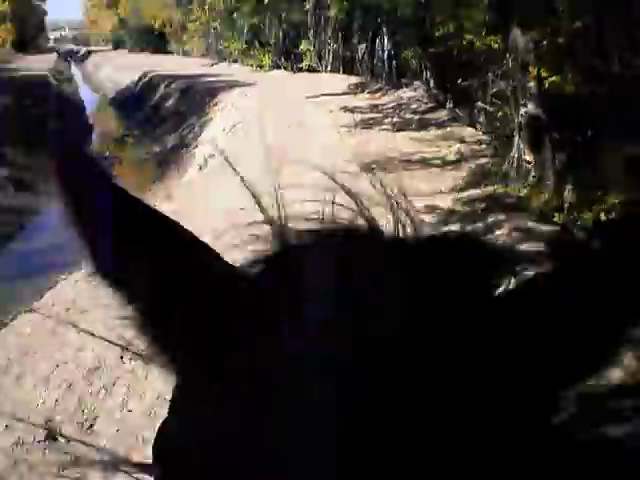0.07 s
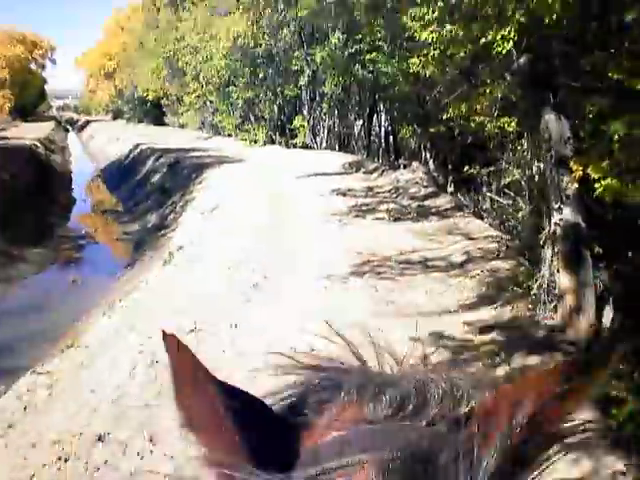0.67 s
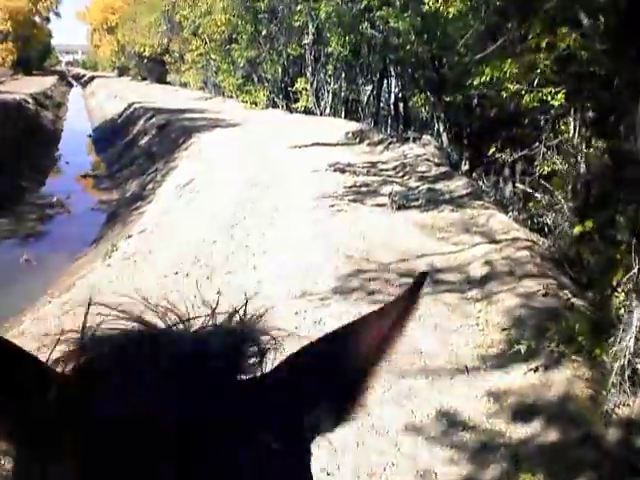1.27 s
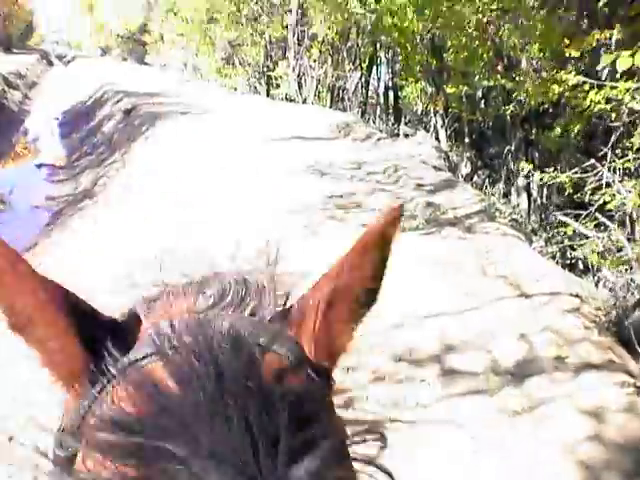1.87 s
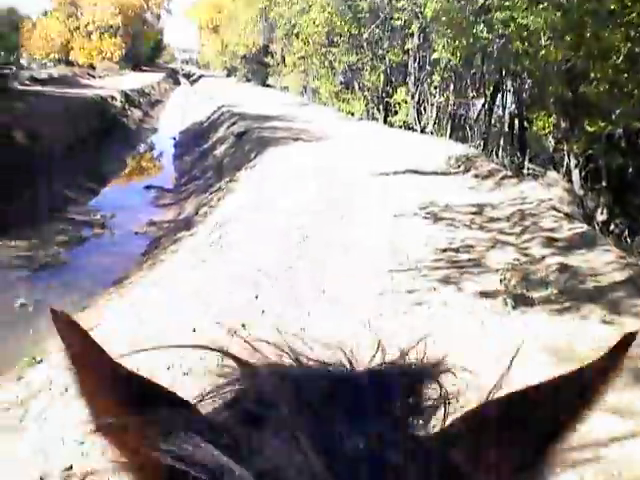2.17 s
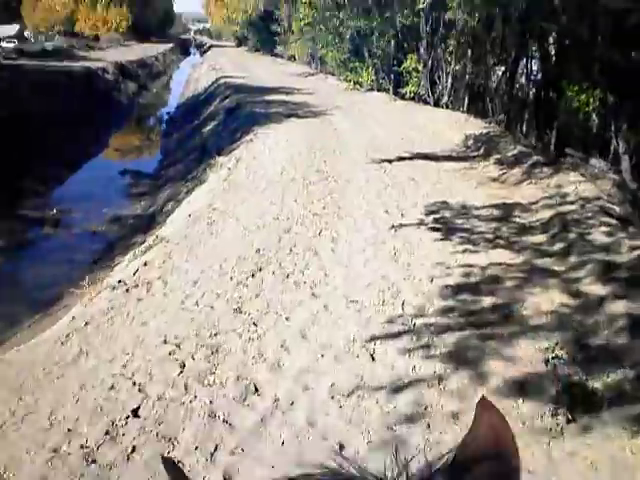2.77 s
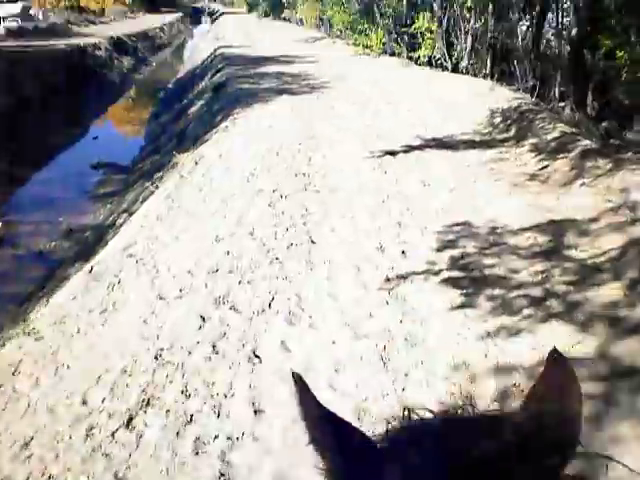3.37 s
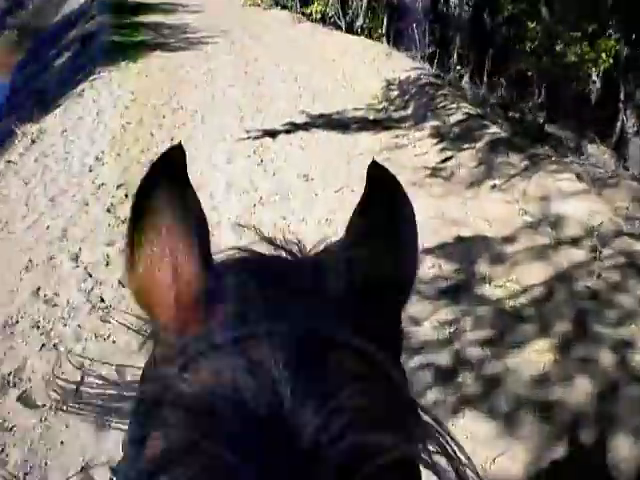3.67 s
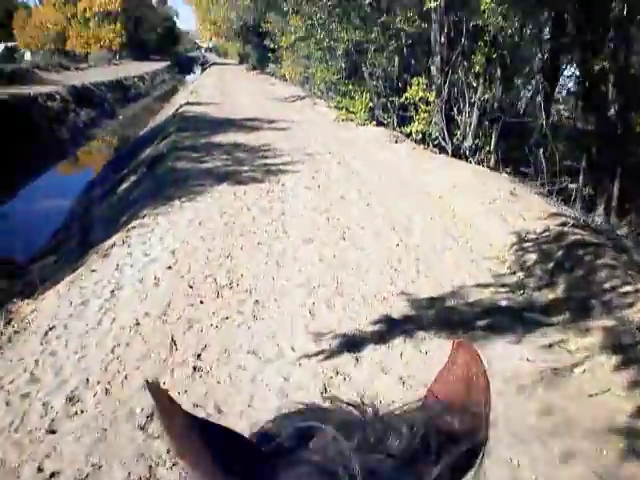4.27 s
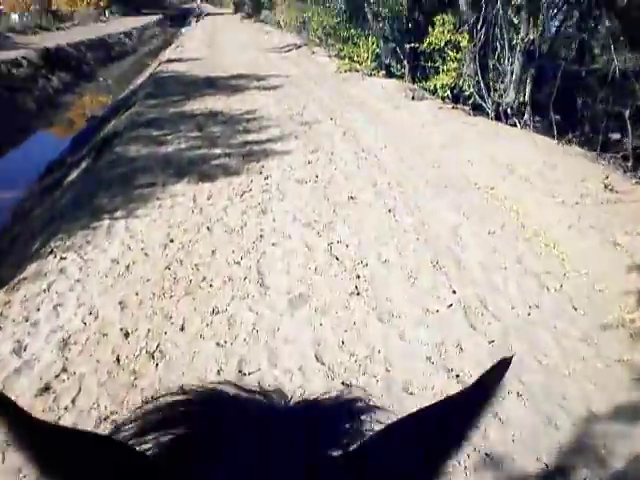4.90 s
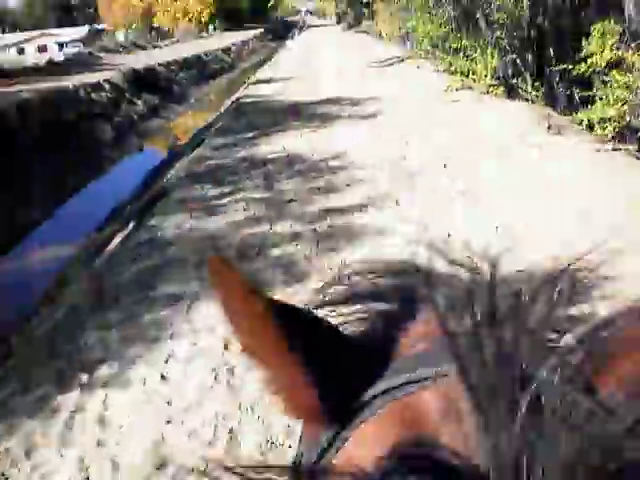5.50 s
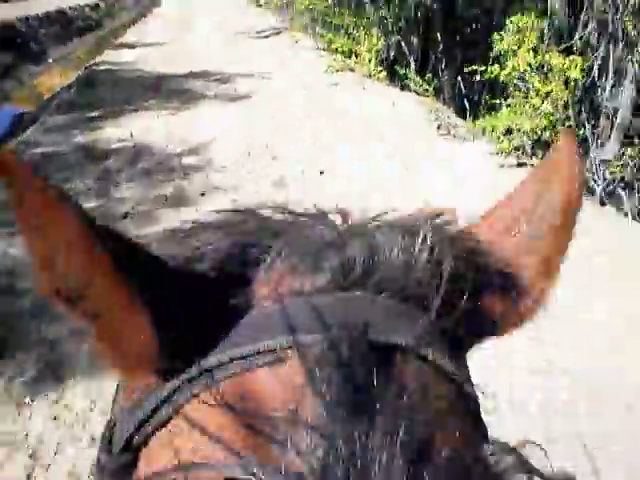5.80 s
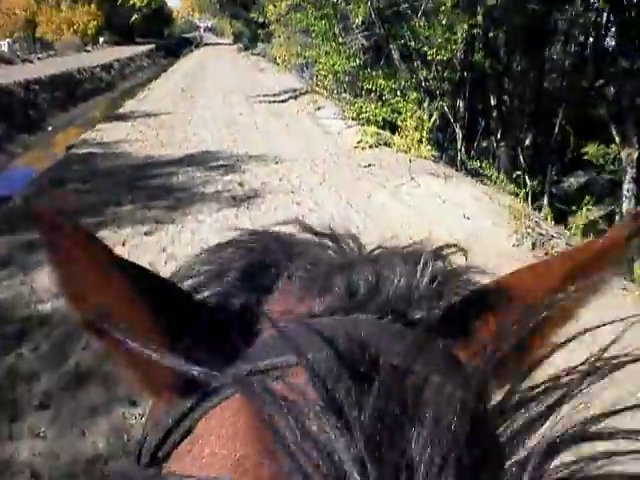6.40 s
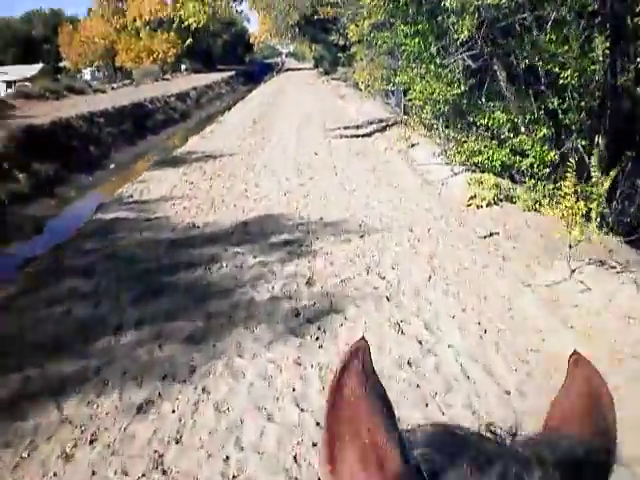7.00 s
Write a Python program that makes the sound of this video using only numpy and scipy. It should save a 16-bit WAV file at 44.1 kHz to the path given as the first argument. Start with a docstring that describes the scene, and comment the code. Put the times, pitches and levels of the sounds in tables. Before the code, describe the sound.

Outdoors on horseback, turbulent air buffets a small microphone with a close, uneven rumble and short thumps. Beneath it come scattered metallic ticks from the tack and a soft rustle of mane and clothes. The ride bumps the camera in irregular clusters, and the mane drags across it once with a brief squeak, followed by faint strap scrapes. Later the gusts grow rougher and crackle.

```python
"""A horse canters along a sandy track, heard through the rider's small camera. After a quiet instant, turbulent
air strikes the microphone: a fluttering rumble that swells in gusts and drops out in lulls. Buckles begin to
tick, mane and clothing rustle with the strides, and from 1 s single hard pulses of air knock the camera body.
Near 1.7 s the mane drags over the casing with a squeak, then straps scrape. As the horse gains speed, small
eddies grow stronger and the wind ends raspier, sputtering."""
import sys
import numpy as np
from scipy import signal
from scipy.fft import rfft, irfft
from scipy.io import wavfile
from scipy.ndimage import uniform_filter1d

SR = 44100
rng = np.random.default_rng(int(sys.argv[2]) if len(sys.argv) > 2 else 0)


def transcribe(u):
    """Save the signal u as a 16-bit wav file named by the first command-line argument.

    u: samples, shape (n,) or (channels, n), limited to [-1, 1]; the rate is SR.
    q: integer samples, one column per channel.
    """
    v = np.clip(np.atleast_2d(u).T, -1, 1)
    q = np.round(v * 32767).astype(np.int16)
    wavfile.write(sys.argv[1], SR, q)


N = 319725
T = np.arange(N) / SR

# The steady air stream. Each row: time in seconds, rumble in dB, rasp relative to the rumble in dB.
STREAM = [(0, -58.5, -28), (.15, -59, -30.5), (.27, -28, -40.5), (.5, -19, -28), (.8, -19.5, -38.5),
          (1.3, -17.5, -24.5), (1.9, -20, -24), (2.2, -18.5, -19), (2.55, -14.5, -14.5), (2.95, -18, -24.5),
          (3.33, -17, -33), (3.55, -17, -21), (3.95, -17, -22.5), (4.45, -19.5, -17), (5.098, -17, -19),
          (5.5, -16.5, -14), (6.1, -19, -14.5), (7.25, -20.5, -14)]
# Gusts. Each row: start, length and rise time in seconds, extra rumble in dB, extra rasp in dB.
GUSTS = [(0.164, 0.034, .004, 9, 3), (0.286, .018, .005, 4, 9), (0.56, 0.11, 0.011, 5, 3.5),
         (0.841, 0.01, .005, 4, 9.5), (0.872, 0.078, .008, 4.5, 10.5), (1.042, 0.076, .008, 3, 4.5),
         (1.172, 0.042, 0.038, 4.5, 12), (1.309, 0.031, 0.0072, 5, 4.5), (1.393, 0.067, 0.0069, 4.5, 4.5),
         (1.556, 0.048, 0.018, -8, 10.5), (1.649, 0.089, .008, 6.5, -2.5), (1.995, 0.13, .006, 3.5, 2),
         (2.408, 0.08, 0.018, 1.5, 1), (2.53, 0.23, .015, 1.25, -1), (2.819, 0.17, .02, 4, 2),
         (2.946, 0.016, 0.0086, 4, -4), (3.063, 0.033, .01, -2, 10), (3.12, 0.02, .02, 6.5, 11.5),
         (3.498, 0.043, 0.011, 0.5, 4), (3.608, 0.019, .005, 5.5, -3), (3.61, 0.11, .008, 2, 8.5),
         (3.958, 0.019, 0.011, 7, 2.5), (4.063, 0.022, 0.011, 5.5, 2.5), (4.124, 0.02, .005, 1.5, 5),
         (4.189, 0.054, .015, 2.5, 5), (4.32, 0.11, 0.051, 2.5, 5.5), (4.519, 0.06, 0.0067, 5.5, 3),
         (4.682, 0.082, 0.0056, 5, 3.5), (4.805, 0.054, 0.013, 3.5, 1.5), (5.268, 0.057, .01, 4.5, -11),
         (5.452, 0.043, .01, 0, 3), (5.794, 0.16, .006, 1.5, -0.5), (5.968, 0.12, .03, 1.5, 5),
         (6.201, 0.033, 0.022, 8, -7), (6.353, 0.12, .012, 3.5, -4), (6.502, 0.062, .02, -1, 4),
         (6.585, 0.045, .006, 3.5, 0.5), (6.653, 0.011, .008, -0.5, 8.5), (6.729, 0.03, .015, 1, 2),
         (6.933, 0.018, .004, 0.5, 6.5), (7.031, 0.052, 0.022, 6.5, -4.5)]
# The stream leaves the microphone. Each row: middle and half length in seconds, depth in dB.
LULLS = [(0.248, 0.0069, 34), (.372, 0.017, 8), (0.407, 0.011, 2), (0.716, 0.0065, 6), (0.987, 0.017, 9),
         (1.26, 0.059, 3), (1.385, 0.0097, 1), (1.844, 0.0058, 25), (1.895, 0.034, 10),
         (1.976, 0.019, 12.5), (2.378, .012, 2.5), (2.505, 0.014, 7.5), (3.015, 0.015, 8.5),
         (3.33, 0.043, 4), (3.287, 0.01, 8.5), (3.4, 0.017, 2.5), (4.055, 0.0088, 5.5), (4.159, 0.013, 5),
         (4.282, 0.011, 3), (4.647, 0.017, 7), (4.793, 0.016, 4.5), (4.856, 0.0065, 8.5), (5.129, 0.03, 4),
         (5.275, 0.012, 6), (5.421, 0.0074, 9.5), (5.741, 0.062, 6.5), (5.772, 0.025, 19.5),
         (5.931, 0.024, 5), (6.182, 0.019, 4), (6.247, 0.0059, 7), (6.33, 0.013, 11), (6.795, 0.02, 18),
         (6.856, 0.011, 11), (6.88, .006, 3), (6.925, 0.0073, 6), (6.983, 0.025, 3.5)]
# Spectrum of the turbulence. Each row: frequency in Hz, relative density in dB.
AIR_SPECTRUM = [(20, -43), (45, -18.5), (90, -7.5), (150, 0), (250, .5), (400, -3.5), (570, -8), (900, -15),
                (1500, -25), (2200, -37), (2800, -47.5), (3500, -57), (5000, -72), (8000, -98.5)]
# How the bands follow the wind. Each row: centre in Hz, share of the rasp, weights in dB of the
# common flutter and of the band's own flicker.
WIND_BANDS = [(40, -0.25, -3, -4.5), (122, 0, 4, 0.5), (258, -0.0842, 3, 0.5), (570, 0.5, 4.5, 2.5),
              (1190, 0.61, 7, 7), (2240, 1.93, 12, 6), (5000, 2.5, 7.5, 9.5)]
# The hardest blows of air. Each row: start in seconds, relative levels of thump and rasp in dB,
# time scale in seconds.
BLOWS = [(0.212, -20.5, -52, .007), (0.327, -7.5, -31.5, 0.0092), (0.432, -7.5, -49, 0.012),
         (0.47, -12, -37, 0.0083), (0.645, -6, -24, 0.0059), (0.742, -4.5, -39, 0.012),
         (0.867, -8, -33, 0.0056), (0.923, -4, -42, .015), (1.036, -5, -33, 0.0073), (1.047, 0, -31, 0.016),
         (1.061, 3.5, -28.5, 0.0089), (1.197, -4.5, -29, 0.031), (1.396, 1, -22, 0.0066),
         (1.414, 1.5, -34, 0.013), (1.489, 1, -21.5, 0.006), (1.679, 1, -25, 0.011),
         (1.819, -13, -23.5, 0.0056), (1.917, -4, -49, 0.0083), (2.003, -1, -16.5, 0.0092),
         (2.07, 2.5, -37, 0.011), (2.108, 0, -16.5, 0.0059), (2.142, -6.5, -18, 0.018),
         (2.349, -8.5, -14.5, 0.0078), (2.427, -3, -19.5, .016), (2.566, -3.5, -15.5, 0.013),
         (2.721, 0, -15.5, 0.0058), (2.783, -2.5, -23, 0.012), (2.84, -2.5, -33, 0.013),
         (2.969, 0, -26, 0.012), (3.15, 2.5, -41, 0.0078), (3.217, -3, -23.5, 0.014),
         (3.366, -8, -36, 0.007), (3.447, -4, -20, 0.0068), (3.605, 0, -16, 0.012),
         (3.887, -1, -28.5, 0.0063), (4.072, -5, -23, .011), (4.119, -2, -29, 0.013),
         (4.213, -2, -27, 0.0054), (4.68, -1.5, -24.5, 0.017), (4.74, -6, -13.5, 0.013),
         (5.022, -5, -23, 0.0074), (5.357, -3, -27, .005), (5.539, -2.5, -18.5, 0.0097),
         (5.627, 2, -18.5, 0.01), (6.039, -9.5, -11, 0.0054), (6.223, -2, -30, 0.0079),
         (6.356, -5, -16, 0.0078), (6.588, -6.5, -22, 0.01), (6.827, -1.5, -21, 0.006),
         (6.858, -4.5, -14.5, 0.0064), (6.903, -1.5, -7, 0.0073), (7.054, -7.5, -13, 0.015),
         (7.094, -1.5, -25, 0.0058)]
# The loudest snaps of air at the microphone port. Each row: start in seconds, peak in dB.
AIR_SNAPS = [(1.468, -18), (1.743, -19), (2.843, -15.5), (3.514, -19), (3.529, -14), (3.89, -13),
             (4.119, -14.5), (4.392, -15), (6.404, -10), (6.427, -15), (6.448, -12), (6.559, -13),
             (6.599, -13), (6.884, -14)]
# Knocks: single pressure pulses of air ring the camera body. Each row: start in seconds, peak of the thump in
# dB, peak of the crack in dB.
KNOCKS = [(1.0837, -7, -37), (1.6445, -2.5, -34), (1.661, -2, -26), (1.7496, -12, -31), (2.072, -4, -16),
          (2.107, 1, -18), (2.147, -12, -18), (3.2834, -2.5, -17.5), (3.452, -9, -22.5), (3.478, -4, -25),
          (5.6336, -3, -16.5), (5.8671, -6, -22), (5.901, 0, -34), (6.2243, 0, -25), (6.829, -2, -17),
          (6.838, -6.5, -27), (6.906, -6, -27)]
# Spectrum of a knock's crack. Each row: frequency in Hz, relative density in dB.
KNOCK_SPECTRUM = [(300, -1), (800, 2), (1600, 5), (3000, -16.5), (4500, -25), (7000, -32.5)]
# Clear ticks of buckles and bit. Each row: start in seconds, relative level in dB, pitch in Hz,
# relative level of the bright snap and ring in dB.
TICKS = [(.3257, -33.5, 4130, -29), (1.0177, -35.5, 3150, -35), (1.1942, -40, 4260, -71),
         (1.332, -35.5, 4400, -51), (1.3674, -37, 4500, -60), (1.645, -44, 3430, -33),
         (1.795, -43, 4300, -48), (1.848, -33.5, 4200, -55), (1.8645, -39, 4250, -40),
         (1.9225, -23.5, 3110, -48), (1.924, -31, 4650, -55.5), (1.9759, -32.5, 3160, -49.5),
         (2.007, -40.5, 3280, -35), (2.184, -45, 4500, -42), (2.4199, -28.5, 4450, -59),
         (3.1328, -34, 3850, -39), (3.8782, -43, 4200, -62), (4.0503, -36.5, 4550, -58),
         (4.0805, -40, 3340, -40), (4.181, -44.5, 4400, -42), (4.4606, -50, 4700, -40),
         (4.5446, -39, 4520, -49), (4.7089, -44, 4600, -60), (4.9922, -48, 4380, -57),
         (5.2152, -44, 4000, -56), (5.2984, -40.5, 3190, -51), (5.594, -34.5, 3150, -58),
         (5.633, -43, 2900, -43), (5.766, -44, 4500, -66), (5.83, -37, 3140, -43),
         (5.856, -31.5, 4340, -43), (5.866, -34, 3420, -34), (6.097, -37, 4470, -64),
         (6.225, -36.5, 3050, -29.5), (6.678, -48, 4660, -53), (6.8101, -44.5, 4200, -54),
         (6.829, -39, 3050, -41), (6.9057, -28, 4060, -48), (6.909, -26, 3150, -48),
         (6.9175, -41, 4100, -47)]
# Modes of a buckle. Each row: frequency in Hz, relative level in dB, seconds to decay by 60 dB.
BUCKLE_MODES = [(4020, -28, .06), (5950, -28.5, .07)]
# The mane slips across the casing. Each row: start in seconds, length in seconds, level in dB.
BRUSHES = [(1.668, 0.016, -27), (1.688, 0.018, -34), (1.708, 0.011, -33.5), (1.72, 0.0092, -46)]
# Spectrum of those slips. Each row: frequency in Hz, relative density in dB.
BRUSH_SPECTRUM = [(500, -17), (1500, 10.5), (2000, 12), (2250, 2), (2600, 5), (3100, 4.5), (4000, -2),
                  (4800, 0), (6000, -6), (7200, -2)]
# The steady rub of mane and clothing. Each row: time in seconds, relative level in dB.
RUSTLE_LEVELS = [(0, -91), (.2, -82), (.4, -66), (2.4, -70), (2.67, -67), (2.9, -64), (3.3, -64),
                 (4.1, -71.5), (5.1, -73.5), (6.2, -81.5), (7.25, -77.5)]
# The mane sweeps past as the horse nods. Each row: middle and half length in seconds, boost in dB.
MANE_SWEEPS = [(0.58, 0.081, 8), (1.376, .05, 5.5), (1.654, 0.063, 8), (1.946, 0.12, 13), (2.5, 0.12, 8.5),
               (3.12, 0.076, 7.5), (3.852, 0.045, 2.5), (4.346, .04, 5.5), (5.19, 0.029, 9),
               (5.826, 0.1, 9.5), (6.82, .07, 6.5)]
# Spectrum of the rustle. Each row: frequency in Hz, relative density in dB.
RUSTLE_SPECTRUM = [(500, -13), (1500, 6), (2800, 5), (4500, 3.5), (5900, 1.5), (6800, -2.5), (7500, -11.5)]
# Scrapes of the straps. Each row: middle and half length in seconds, level in dB.
SCRAPES = [(1.89, .05, -52), (1.99, 0.03, -54), (3.84, .03, -59), (5.193, 0.022, -65)]
# Spectrum of the scrapes. Each row: frequency in Hz, relative density in dB.
SCRAPE_SPECTRUM = [(2000, -24.5), (3600, -9.5), (4300, 4), (4900, -0.5), (5800, -8.5), (6600, -12.5),
                   (7500, -16)]


def wind(level_db=0.5, usual_rasp_db=-17, follow_hz=230, calm_db=-19, spit_db=6.5, waver_db=1.22):
    """Turbulence: eddies of all sizes hit the microphone; small, bright ones depend most on air speed."""
    rumble_db, rasp_db, gusting = air_stream()
    rasp_db = rasp_db - usual_rasp_db + waver_db * flutter(slow_hz=4.3, fast_hz=5.8)
    lull_db, spit = lulls(), spits()
    # in fast air and in gusts the separate buffets merge into a denser roar
    choppiness = 1 - 0.35 * gusting
    buffet_depth = np.clip(0.57 - 0.038 * rasp_db, .4, .85)
    buffet = buffet_depth * np.clip(flutter(slow_hz=7.8, fast_hz=75), -2.8, 1.7)
    hz = np.fft.rfftfreq(N, 1 / SR)
    spectrum = rfft(noise(AIR_SPECTRUM))
    centres = [row[0] for row in WIND_BANDS]
    out = np.zeros(N)
    for weights, (centre, share, flutter_db, flicker_db) in zip(np.eye(len(centres)), WIND_BANDS):
        band = irfft(spectrum * log_interp(np.transpose([centres, weights]), hz), N)
        wobble_db = flutter_db * buffet * (1 - .5 * spit) + share * spit_db * spit
        wobble_db += flicker_db * flutter(slow_hz=25, fast_hz=191)
        wobbling = band * amp(choppiness * wobble_db)
        eddies = band.std() * even_out(wobbling, size=3200 if centre > 200 else 6000)
        # large, slow eddies ride through lulls and gusts
        follow = min(1, centre / follow_hz)
        steadying_db = (1 - follow) * np.clip(calm_db - rumble_db, -12, 8)
        lull_share = max(follow, 0.24) + 0.82 * share
        out += eddies * amp(rumble_db + share * rasp_db - lull_share * lull_db + steadying_db)
    return amp(level_db) * out


def air_stream(release_s=0.013):
    """Gusts ride on a mean flow, giving rumble in dB, rasp in dB and gustiness from 0 to 1."""
    times, steady_rumble_db, steady_rasp_db = np.transpose(STREAM)
    rumble_db = np.interp(T, times, steady_rumble_db)
    rasp_db = np.interp(T, times, steady_rasp_db)
    gusting = np.zeros(N)
    for start, length, rise, extra_rumble_db, extra_rasp_db in GUSTS:
        gust = swell(start, length, rise, release_s)
        rumble_db += extra_rumble_db * gust
        rasp_db += extra_rasp_db * gust
        gusting = np.maximum(gusting, gust)
    return rumble_db, rasp_db, gusting


def lulls(stall_db=2.0, stall_half_s=0.0077):
    """Attenuation in dB as the flow leaves the microphone, or stalls just before a hard blow."""
    out = np.zeros(N)
    stalls = [(row[0] - 1.2 * stall_half_s, stall_half_s, stall_db) for row in BLOWS]
    for middle, half, depth_db in LULLS + stalls:
        span = slice(max(int((middle - 3 * half) * SR), 0), int((middle + 3 * half) * SR))
        offset = (T[span] - middle) / half
        steepness = np.where(offset < 0, 2, 6)  # fades gently, returns abruptly
        out[span] = np.maximum(out[span], depth_db * np.exp(-np.abs(offset) ** steepness))
    return out


def spits(per_s=29, longest_s=0.0099, jitter=0.51, count=400):
    """Vortex shedding: eddies break on the port at a loose rate, each a short swell of height up to 1."""
    gap_draws, height_draws = rng.standard_normal((count, 2)).T
    starts = np.cumsum(np.exp(jitter * gap_draws)) / per_s
    heights = np.clip(0.62 + 0.073 * height_draws, .2, 1)
    out = np.zeros(N)
    for start, height in zip(starts, heights):
        add(out, start, height * np.sin(np.linspace(0, np.pi, int(height * longest_s * SR))))
    return np.minimum(out, 1)


def air_blows(rows, thump_gain_db=-7.5, rasp_gain_db=-4.0, thump_hz=320, port_hz=170, rasp_lag_s=.0015):
    """Pressure pulses: a few low swings and a puff of rasp, high-passed by the small microphone port."""
    out, t = np.zeros(N), np.arange(4096) / SR
    for start, thump_db, rasp_db, length in rows:
        thump_age = t / (.5 * length)  # each envelope peaks at age 1
        puff_age = thump_age / 0.71
        # the swing is uneven in pitch, so it thuds without a note
        wander = noise([(100, 4.0), (500, -3.5), (1500, -36.0), (4000, -62.5)], len(t))
        cycles = np.cumsum(thump_hz * amp(3.234 * wander)) / SR + rng.random()
        thump = np.sin(2 * np.pi * cycles) * thump_age * np.exp(1 - thump_age)
        add(out, start, amp(thump_db + thump_gain_db) * thump)
        puff = noise([(300, -4.5), (700, 9.5), (1400, 0), (2300, -12.5), (4000, -33), (7000, -51)], len(t))
        puff = even_out(puff, size=150) * puff_age * np.exp(1 - puff_age)
        add(out, start + rasp_lag_s, amp(rasp_db + rasp_gain_db) * puff)
    return signal.sosfilt(signal.butter(2, port_hz, "highpass", fs=SR, output="sos"), out)


def light_blows(per_s=3, thump_db=8, puff_db=6, spread_db=3.5, length_s=0.0074):
    """Fluctuations scale with the flow: rows of chance blows that follow the wind and its lulls."""
    rumble_db, rasp_db, _ = air_stream()
    starts, strength, _ = chance_events(per_s).T
    level_db = np.interp(starts, T, rumble_db - lulls()) + spread_db * strength
    puff_levels_db = level_db + np.interp(starts, T, rasp_db) + puff_db
    return list(zip(starts, level_db + thump_db, puff_levels_db, np.full(len(starts), length_s)))


def sputter(per_s=18, above_rasp_db=8.5, spread_db=3, rise_s=.0007, t60=0.006):
    """Tiny eddies snap at the port as impulses: a few loud ones, the rest following the wind's rasp."""
    rumble_db, rasp_db, _ = air_stream()
    force_db = rumble_db + rasp_db - 2 * lulls()
    cracks = [(start, force_db[int(start * SR)] + above_rasp_db + spread_db * strength)
              for start, strength, _ in chance_events(per_s, count=200)]
    out, t = np.zeros(N), np.arange(512) / SR
    for start, peak_db in cracks + AIR_SNAPS:
        crack = noise([(300, -7), (800, 7), (1400, -5.5), (2100, -14), (3000, -26), (6000, -53.5)], len(t))
        crack *= (1 - np.exp(-t / rise_s)) ** 2 * decay(t, t60)
        add(out, start, amp(peak_db) * unit_peak(crack))
    return out


def camera_knocks(body_hz=380, body_t60=0.0071, crack_t60=0.0064, rise_s=0.00032):
    """Impulse excitation: a single pressure pulse gives a dry crack and a heavily damped swing of the camera
    body."""
    out, t = np.zeros(N), np.arange(2048) / SR
    rise = 1 - np.exp(-t / rise_s)
    thump = np.sin(2 * np.pi * body_hz * t) * decay(t, body_t60) * rise ** 2
    for start, thump_db, crack_db in KNOCKS:
        crack = noise(KNOCK_SPECTRUM, len(t)) * decay(t, crack_t60) * rise
        add(out, start, amp(thump_db) * unit_peak(thump) + amp(crack_db) * unit_peak(crack))
    return out


def tack(rows, tick_gain_db=3.5, snap_gain_db=2.5, snap_hz=6400):
    """Damped free vibration: metal meets leather with a click, a note, a snap and a buckle's faint ring."""
    out, t = np.zeros(N), np.arange(4096) / SR
    ring = sum(amp(db) * decay(t, t60) * np.sin(2 * np.pi * hz * t) for hz, db, t60 in BUCKLE_MODES)
    rise = 1 - np.exp(-t / 0.00015)
    snap_spectrum = [(snap_hz * .7, -25), (snap_hz * .92, 0), (snap_hz * 1.06, -1), (snap_hz * 1.18, -16)]
    for start, tick_db, hz, snap_db in rows:
        click = noise([(hz / 2, -18), (hz * 1.3, -6), (hz, 0), (hz * 1.15, -11),
                       (hz * 1.3, -10), (hz * 1.4, -22), (hz * 2, -40)], len(t))
        click *= rise * decay(t, t60=0.015)
        note = rise * decay(t, t60=0.014) * np.sin(2 * np.pi * hz * t)
        snap = noise(snap_spectrum, len(t)) * rise * decay(t, t60=0.0044)
        add(out, start, amp(tick_db + tick_gain_db) * (amp(-3) * unit_peak(click) + amp(-5) * note))
        add(out, start, amp(snap_db + snap_gain_db) * (unit_peak(snap) + ring))
    return out


def faint_ticks(per_s=1.2, tick_db=-45, snap_db=-55.5, spread_db=3.5, low_hz=3300, high_hz=4700):
    """Random excitation: rows of soft ticks from the tack as the ride shakes it."""
    starts, strength, pitch = chance_events(per_s).T
    offset_db = spread_db * strength
    return list(zip(starts, tick_db + offset_db, low_hz + pitch * (high_hz - low_hz), snap_db + offset_db))


def mane_brush(squeak_start=1.672, squeak_s=0.031, squeak_hz=2810, sag_hz_per_s=7600, squeak_db=-34.5):
    """Stick-slip friction: the mane drags over the casing, which at first squeaks with sinking pitch."""
    attack_s, release_s = 0.0022, 0.0057
    touch = sum(amp(db) * swell(start, length, attack_s, release_s) for start, length, db in BRUSHES)
    grain = flutter(slow_hz=80, fast_hz=398)
    elapsed = np.clip(T - squeak_start, 0, 2 * squeak_s)
    hz = squeak_hz - sag_hz_per_s * elapsed + 100 * flutter(slow_hz=30, fast_hz=500)
    squeak = amp(squeak_db + 2.5 * grain) * np.sin(2 * np.pi * np.cumsum(hz) / SR)
    squeak *= swell(squeak_start, squeak_s, attack_s, release_s)
    scrape = touch * unit_rms(amp(2.0 * grain)) * noise(BRUSH_SPECTRUM)
    return scrape + squeak


def rustle(level_db=8.5, grain_db=3.0, catch_db=11.0, catches_per_s=22, catch_s=0.00042, waver_db=2.0):
    """Sliding friction: hair and cloth move in tiny slips and now and then catch."""
    slips = unit_rms(amp(grain_db * flutter(slow_hz=9.9, fast_hz=280)))
    impulses = (rng.random(N) < catches_per_s / SR) * rng.random(N)
    catches = signal.lfilter([1], [1, -np.exp(-1 / (catch_s * SR))], impulses)
    steady_db = np.interp(T, *np.transpose(RUSTLE_LEVELS))
    sweep_db = sum(db * np.exp(-((T - middle) / half) ** 2) for middle, half, db in MANE_SWEEPS)
    pressure_db = sweep_db + waver_db * flutter(slow_hz=5, fast_hz=7)
    rub = amp(steady_db + pressure_db + level_db) * noise(RUSTLE_SPECTRUM)
    return rub * (slips + amp(catch_db) * catches)


def strap_scrapes(grain_db=9.5):
    """Granular friction: dusty straps scrape over each other in clumps of bright grains."""
    pressure = sum(amp(db) * np.exp(-((T - middle) / half) ** 2) for middle, half, db in SCRAPES)
    grains = even_out(amp(grain_db * flutter(slow_hz=40, fast_hz=350)), size=1500)
    return pressure * grains * noise(SCRAPE_SPECTRUM)


def chance_events(per_s, count=100, under_way_s=.4):
    """A jittered pulse train. Each row: start in seconds, strength from -1 to 1, pitch from 0 to 1."""
    jitter, strength, pitch = rng.random((count, 3)).T
    starts = under_way_s + (np.arange(count) + jitter) / per_s
    return np.transpose([starts, 2 * strength - 1, pitch])[starts < T[-1]]


def noise(spectrum, size=N):
    """Spectral shaping of white noise, at rms 1."""
    gain = amp(log_interp(spectrum, np.fft.rfftfreq(size, 1 / SR)))
    return unit_rms(irfft(rfft(rng.standard_normal(size)) * gain, size))


def flutter(slow_hz, fast_hz):
    """Band-limited random modulation of rms 1."""
    hz = np.fft.rfftfreq(N, 1 / SR)
    passband = hz / np.hypot(hz, slow_hz) / (1 + (hz / fast_hz) ** 2)
    return unit_rms(irfft(rfft(rng.standard_normal(N)) * passband, N))


def even_out(x, size):
    """Division by the running rms, smoothed over size samples, leaves only the fast texture."""
    power = uniform_filter1d(uniform_filter1d(x ** 2, size), size)
    return x / np.sqrt(np.abs(power) + 1e-20)


def swell(start, length, attack, release):
    """Trapezoidal envelope: rises around the start, holds at 1 and falls after its length."""
    return np.clip((T - start) / attack + .5, 0, 1) * np.clip(1 - (T - start - length) / release, 0, 1)


def decay(t, t60):
    """Exponential damping by 60 dB in t60 seconds."""
    return amp(-60 * t / t60)


def amp(db):
    """Decibels to gain."""
    return 10 ** (np.asarray(db) / 20)


def unit_rms(x):
    """Scales to rms 1."""
    return x / np.sqrt(np.mean(x ** 2) + 1e-20)


def unit_peak(x):
    """Scales to peak 1."""
    return x / abs(x).max()


def log_interp(points, hz):
    """Interpolation on a log-frequency axis."""
    point_hz, values = np.transpose(points)
    return np.interp(np.log(hz + 1), np.log(point_hz + 1), values)


def add(mix, start, sound):
    """Superposes a sound at a start in seconds."""
    part = mix[max(round(start * SR), 0):][:len(sound)]
    part += sound[:len(part)]


def scene():
    """Superposition: all sources sum at one microphone in the open air."""
    air = wind() + sputter() + air_blows(BLOWS) + air_blows(light_blows())
    ride = camera_knocks() + rustle() + mane_brush() + strap_scrapes() + tack(TICKS) + tack(faint_ticks())
    return (air + ride)[None]


def record(dry, notch_hz=5390, notch_width_hz=700, ceiling=.93, low_hz=32, high_hz=7480):
    """Filtering and saturation: the camera notches the treble, rounds off peaks and limits the band."""
    notched = signal.lfilter(*signal.iirnotch(notch_hz, notch_hz / notch_width_hz, fs=SR), dry)
    rounded = notched / (1 + (notched / ceiling) ** 8) ** (1 / 8)
    bass_cut = signal.sosfilt(signal.butter(2, low_hz, "highpass", fs=SR, output="sos"), rounded)
    lowpass = signal.firwin(221, high_hz, window=("kaiser", 8), fs=SR)
    return signal.oaconvolve(bass_cut, lowpass[None], "same")


dry = scene()
out = record(dry)
transcribe(out)
```